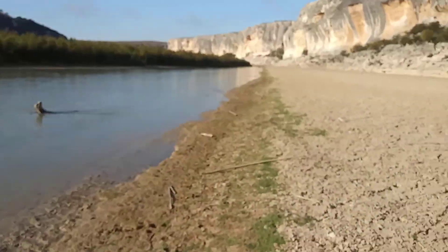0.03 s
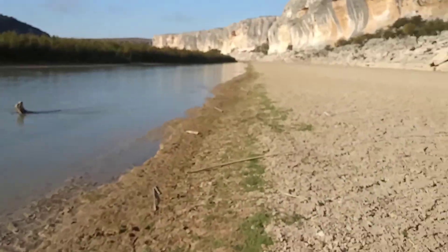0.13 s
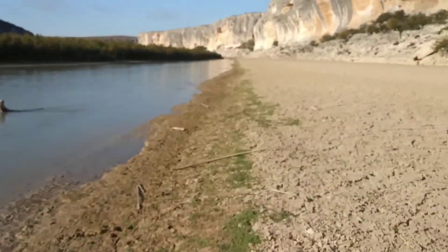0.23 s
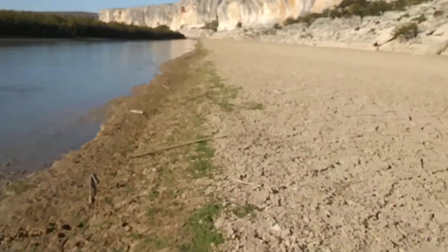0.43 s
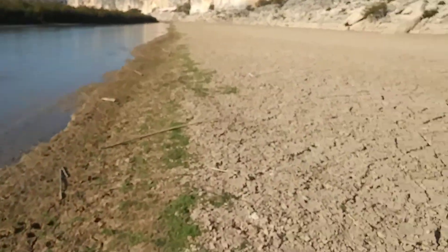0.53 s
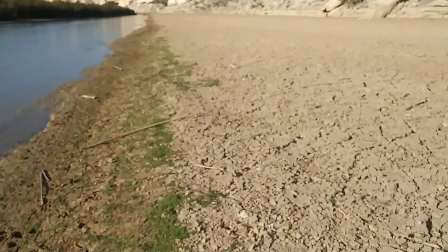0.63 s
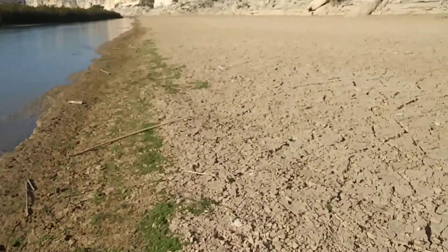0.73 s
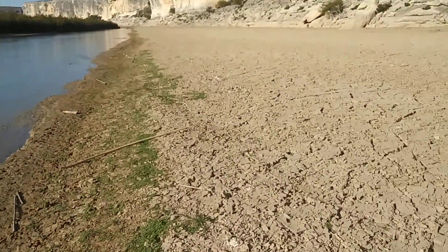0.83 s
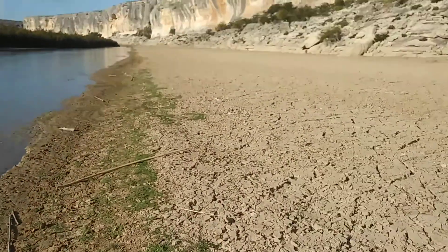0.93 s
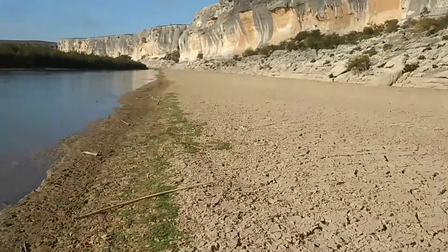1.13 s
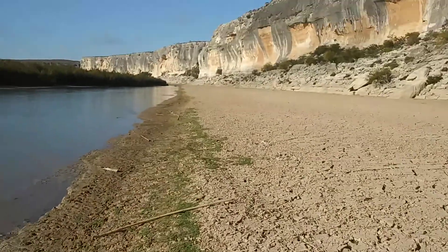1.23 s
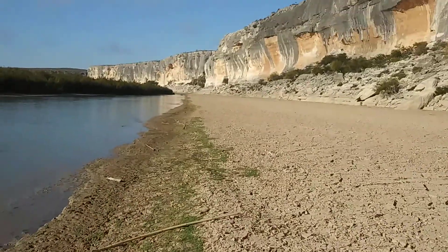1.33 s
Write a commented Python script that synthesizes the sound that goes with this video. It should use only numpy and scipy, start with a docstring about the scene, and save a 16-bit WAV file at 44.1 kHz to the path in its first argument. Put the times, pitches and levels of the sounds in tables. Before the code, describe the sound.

A single footstep crunches through sun-baked mud crust outdoors, then grinds the loose crumbs.

```python
"""A footstep on sun-baked mud: the heel thumps through the crust, the sole rolls on and snaps more
plates, and the push-off grinds the crumbs. Each snap is a burst of micro-fractures; dry clicks tick and
a loose plate rings hollow. Trouser cloth swishes as the leg swings through. Underneath lies a faint
open-air bed of river and breeze, and a thin, fluttering chirr comes up after the step."""
import sys
import numpy as np
from scipy import signal
from scipy.fft import rfft, irfft, next_fast_len
from scipy.io import wavfile
from scipy.ndimage import map_coordinates

SR = 44100
rng = np.random.default_rng(int(sys.argv[2]) if len(sys.argv) > 2 else 0)


def transcribe(u):
    """Save the signal u as a 16-bit wav file named by the first command-line argument.

    u: samples, shape (n,) or (channels, n), limited to [-1, 1]; the rate is SR.
    q: integer samples, one column per channel.
    """
    v = np.clip(np.atleast_2d(u).T, -1, 1)
    q = np.round(v * 32767).astype(np.int16)
    wavfile.write(sys.argv[1], SR, q)


N = 61739
TIME = np.arange(N) / SR


def amp(db):
    """Decibels to gain."""
    return 10 ** (np.asarray(db) / 20)


def unit(x):
    """Scale to rms 1."""
    return x / np.sqrt(np.mean(x ** 2) + 1e-20)


def fader(points):
    """Gain per sample from (time_s, level_db) points, holding the first and last levels."""
    return amp(np.interp(TIME, *np.transpose(points)))


def coloured(x, colour, size=2048):
    """Shape x with a minimum-phase EQ drawn through (freq_hz, gain_db) points."""
    freq_hz, gain_db = np.transpose(colour)
    bins_hz = np.fft.rfftfreq(size, 1 / SR)
    curve_db = np.interp(np.log(bins_hz + 1), np.log(freq_hz), gain_db)
    cepstrum = irfft(np.log(amp(curve_db)))
    cepstrum[1:size // 2] *= 2  # folded forward, so nothing rings ahead of a hit
    cepstrum[size // 2 + 1:] = 0
    impulse_response = irfft(np.exp(rfft(cepstrum)))
    return signal.fftconvolve(x, impulse_response)[:len(x)]


def add(track, start_s, sound):
    """Mix a sound in at its start time."""
    part = track[max(0, round(start_s * SR)):][:len(sound)]
    part += sound[:len(part)]


def wobble(per_s):
    """A smooth random curve with so many knots a second."""
    knots = rng.standard_normal(N)[:int(N * per_s / SR) + 4]
    return map_coordinates(knots, [TIME * per_s])


def rush(colour, levels, waver_db=0.5):
    """Soft, slightly wavering noise with an EQ and a level ride."""
    waver = amp(waver_db * wobble(per_s=25))
    return fader(levels) * waver * unit(coloured(rng.standard_normal(N), colour))


def ticks(per_s, spread_db, size):
    """Raw crackle: random tiny impulses of uneven strength."""
    hits = rng.random(size) < per_s / SR
    polarity = rng.choice([-1, 1], size)
    strength = amp(spread_db * np.clip(rng.standard_normal(size), -2, 2))
    return hits * polarity * strength


def ring(pitch_hz, t60_s, rise_s):
    """One damped mode with a softened attack."""
    decay = np.exp(-np.log(1000) * TIME / t60_s)
    attack = 1 - np.exp(-TIME / rise_s)
    return np.sin(2 * np.pi * pitch_hz * TIME) * decay * attack


def river_and_breeze():
    """Water and moving air lay down a soft midrange wash with a high hiss on top."""
    # EQ of the wash and of the hiss: freq_hz, gain_db
    wash_colour = [(30, -54), (70, -23), (150, -5.5), (400, -2.5), (700, -4), (1100, -2), (1700, 0),
                   (2050, 1), (2500, -8.5), (4000, -17), (10000, -38), (16000, -36)]
    hiss_colour = [(2000, -12.5), (4000, -9.5), (6300, 4.5), (8000, 0.5), (9500, -8), (11500, -22.5),
                   (16000, -26)]
    # level ride of each: time_s, level_db
    wash_levels = [(0, -55.5), (.5, -61), (.87, -63.5), (1.04, -60), (1.2, -57.5), (1.4, -58)]
    hiss_levels = [(0, -56), (.17, -54), (.4, -55.5), (.8, -63.5), (.98, -61), (1.04, -64), (1.13, -60),
                   (1.4, -64)]
    return rush(wash_colour, wash_levels) + rush(hiss_colour, hiss_levels)


def crumbs():
    """Loose grit crackles as it grinds under the sole."""
    # swells of the grinding: time_s, level_db
    grind_levels = [(.175, -67), (.2, -97), (.24, -31), (.26, -57), (.3, -49.5), (.39, -56.5), (.43, -45),
                    (.47, -38), (.51, -50.5), (.565, -58.5), (.61, -52.5), (.645, -37), (.663, -52.5),
                    (.76, -59), (.86, -62.5), (1.4, -94)]
    # EQ of the grit: freq_hz, gain_db
    grit_colour = [(80, -24), (300, -7.5), (800, -1.5), (1400, 6.5), (2200, -8), (2900, 2), (3900, -8),
                   (5000, -1.5), (8500, -11.5), (10800, -40), (16000, -47)]
    crackle = ticks(per_s=3200, spread_db=9, size=N)
    return fader(grind_levels) * unit(coloured(crackle, grit_colour))


def fracture(length_s, colour, settle_s, settle_db, attack_s=0.00018, size=3072):
    """A run of micro-fractures and its tail of settling debris, with the energy of 5 ms at rms 1."""
    t = np.arange(size) / SR
    attack = 1 - np.exp(-t / attack_s)
    breaking = np.exp(-(t / length_s) ** 2.2)
    settling = amp(settle_db) * np.exp(-t / settle_s)
    crackle = ticks(per_s=13000, spread_db=2.5, size=size)
    burst = coloured(attack * (breaking + settling) * crackle, colour)
    return burst * np.sqrt(0.005 * SR / (np.sum(burst ** 2) + 1e-20))


def crust():
    """Each snap knocks the hollow below, rings the mud plate and sprays brittle treble and splinters."""
    # snaps of the crust: start_s, length_s, pitch_hz, knock_db, plate_db, brittle_db
    snaps = [(0.187, 0.0017, 1040, -42, -51, -35.5), (0.2005, 0.001, 1440, -51, -65, -42),
             (.2054, 0.0048, 1974, -15, -19, -11.5), (.209, 0.0074, 1100, -23, -24.5, -19),
             (0.212, 0.0076, 1630, -34.5, -25, -19), (0.2216, 0.0059, 1330, -26.5, -28.5, -13.5),
             (0.2349, 0.0014, 1420, -50, -32, -22.5), (.2373, 0.001, 1370, -58, -36, -28),
             (0.2419, 0.0012, 1300, -50, -36, -28), (0.244, 0.0024, 1320, -51, -32, -21.5),
             (0.2651, 0.0017, 1280, -32.5, -30, -20.5), (0.268, 0.00065, 1240, -65, -47, -23),
             (0.28, 0.0012, 1290, -40, -41.5, -36.5), (0.2955, 0.0024, 1170, -44.5, -52, -46),
             (0.302, 0.0075, 1480, -43.5, -50, -37.5), (0.339, 0.0026, 1480, -60, -51.5, -47),
             (0.3536, 0.0037, 1950, -73, -51, -43.5), (0.415, 0.0023, 1660, -49, -32.5, -31),
             (0.422, 0.0061, 1480, -60, -43.5, -33.5), (0.44, 0.00059, 1500, -62, -38, -27.5),
             (0.4436, 0.0021, 1575, -37.5, -19.5, -23.5), (0.4583, 0.0024, 1300, -47.5, -34.5, -30.5),
             (0.464, 0.0056, 1370, -45, -23.5, -17.5), (0.472, 0.002, 1560, -56, -27.5, -30),
             (0.48, 0.0039, 1180, -51, -43.5, -37.5), (0.4993, 0.0019, 1510, -67, -40, -27.5),
             (0.5872, 0.0012, 1910, -62, -47.5, -50), (0.622, 0.0017, 1380, -44, -49, -34),
             (.626, 0.0015, 1450, -56, -48, -38), (0.635, 0.0072, 1315, -50, -34.5, -45),
             (.6408, 0.0013, 1290, -50, -36.5, -36.5), (.6442, 0.0019, 1360, -53, -41, -39.5),
             (0.6573, 0.0028, 1470, -52, -44, -45), (0.6677, 0.0018, 1470, -56, -47, -36),
             (0.7, 0.0072, 1350, -72, -48.5, -42.5), (0.747, 0.0019, 1500, -56.5, -46.5, -40.5),
             (0.753, 0.0079, 1300, -53.5, -45.5, -48), (0.829, 0.0024, 2000, -55, -52, -62)]
    # EQ of the four layers of a snap: freq_hz, gain_db
    knock_colour = [(60, -40), (130, -19.5), (260, -15), (440, -3.5), (640, -8.5), (820, -1), (1080, -10.5),
                    (1800, -11.5), (5000, -53.5)]
    plate_colour = [(300, -44), (800, -14.5), (1200, -5.5), (1450, 2.5), (1700, -5.5), (2250, -15.5),
                    (2800, -14.5), (3600, -15), (7000, -43)]
    brittle_colour = [(900, -27), (2300, -20.5), (2950, -2), (3400, -6), (4100, -5.5), (4900, -0.5),
                      (6300, 0.5), (7700, 1.5), (9200, -3), (10700, -22.5), (13500, -34), (16000, -33)]
    splinter_colour = [(6000, -24), (10000, 5.5), (13500, 4.5), (16000, -20)]
    # debris tails of knock, plate and treble: decay_s in the first table, level_db in the second
    settle_s = [0.00705, 0.0055, 0.0077]
    settle_db = [-22, 3.5, -14]
    knock_tail, plate_tail, treble_tail = zip(settle_s, settle_db)
    plate_peak_hz = 1450  # the plate's EQ slides to put this peak on each snap's pitch
    out = np.zeros(N)
    for start_s, length_s, pitch_hz, knock_db, plate_db, brittle_db in snaps:
        tuned_plate = np.multiply(plate_colour, [pitch_hz / plate_peak_hz, 1])
        # the hardest and shortest snaps throw the most top treble
        shortness_octaves = np.log2(settle_s[-1] / length_s)
        splinter_db = -15 + 1.58 * brittle_db + 3.5 * shortness_octaves
        knock = amp(knock_db) * fracture(length_s, knock_colour, *knock_tail)
        plate = amp(plate_db) * fracture(length_s, tuned_plate, *plate_tail)
        brittle = amp(brittle_db) * fracture(length_s, brittle_colour, *treble_tail)
        splinters = amp(splinter_db) * fracture(length_s, splinter_colour, *treble_tail)
        add(out, start_s, knock + plate + brittle + splinters)
    return out


def thumps():
    """Dead, low thuds as the foot lands, rolls and lifts."""
    # thuds of the foot: start_s, pitch_hz, relative_db
    thuds = [(0.2058, 140, -24), (0.231, 85, -47), (0.2645, 110, -56), (0.485, 92, -61), (.912, 195, -56)]
    out = np.zeros(N)
    for start_s, pitch_hz, relative_db in thuds:
        add(out, start_s, 2 * amp(relative_db) * ring(pitch_hz, t60_s=0.035, rise_s=0.0019))
    return out


def dry_clicks():
    """Short, dry, pitched clicks of one mode each: small clods and the ring of some snaps."""
    # pitched clicks: start_s, pitch_hz, peak_db
    clicks = [(0.3595, 1910, -33), (0.364, 1950, -34), (.4442, 2580, -16.5), (0.5004, 3080, -25.5),
              (.525, 1780, -28.5), (0.732, 2920, -39)]
    out = np.zeros(N)
    for start_s, pitch_hz, peak_db in clicks:
        click = ring(pitch_hz, t60_s=0.005, rise_s=0.0005)
        add(out, start_s, amp(peak_db) * click / np.abs(click).max())
    return out


def loose_plate(pitch_hz=1430):
    """A loose plate rings hollow in one narrow resonance while the sole grinds on it."""
    # swells of the ring: time_s, level_db
    ring_levels = [(.62, -68), (.655, -51.5), (.72, -63), (.755, -57.5), (.88, -80)]
    b, a = signal.iirpeak(pitch_hz, Q=pitch_hz / 210, fs=SR)
    grinding = rng.standard_normal(N)
    ringing = signal.lfilter(b, a, signal.lfilter(b, a, grinding))  # twice, for steep skirts
    return fader(ring_levels) * unit(ringing)


def trouser_swish():
    """The trouser legs brush past each other: a dull rub, then a brighter one as the leg speeds up."""
    # EQ of each rub: freq_hz, gain_db
    dull_colour = [(70, -13), (170, -4), (400, -1.5), (800, 3.5), (1300, -2), (2400, -15), (8000, -20),
                   (11000, -35)]
    bright_colour = [(700, -25), (1400, -3), (1900, 1), (2400, -19), (4000, -23), (8000, -13), (11000, -40)]
    # level ride of each, the dull rub starting again at the very end: time_s, level_db
    dull_levels = [(.895, -70.5), (0.933, -51), (.97, -56), (1.025, -66), (1.37, -81), (1.395, -53.5)]
    bright_levels = [(.92, -79), (.945, -55), (1.008, -50), (1.035, -78)]
    return rush(dull_colour, dull_levels) + rush(bright_colour, bright_levels)


def chirr(centre_hz=1640, wander_hz=65, flutter_db=6, flutter_per_s=130):
    """A thin, unsteady tone that comes in quick, uneven pulses."""
    # swell after the step: time_s, level_db
    chirr_levels = [(1.03, -71), (1.1, -60), (1.23, -56.5), (1.4, -62)]
    pitch_hz = centre_hz + wander_hz * wobble(flutter_per_s)
    tone = np.sin(2 * np.pi * np.cumsum(pitch_hz) / SR)
    pulses = amp(flutter_db * np.minimum(wobble(flutter_per_s), 1))
    return fader(chirr_levels) * unit(pulses * tone)


def scene():
    """The step, the cloth and the chirr over river and breeze, in mono."""
    step = crust() + thumps() + dry_clicks() + crumbs() + loose_plate()
    return (step + trouser_swish() + river_and_breeze() + chirr())[None]


def record(dry):
    """The microphone sheds deep bass, rounds the highest peaks and keeps nothing above its band limit."""
    low_cut_hz, top_hz, roll_off_hz = 62, 16500, 900
    ceiling, hardness = 0.72, 5  # soft clip
    low_cut = signal.butter(2, low_cut_hz, "highpass", fs=SR, output="sos")
    thinned = signal.sosfilt(low_cut, dry)
    rounded = thinned / (1 + np.abs(thinned / ceiling) ** hardness) ** (1 / hardness)
    size = next_fast_len(N + SR // 2)
    edge = np.clip((top_hz - np.fft.rfftfreq(size, 1 / SR)) / roll_off_hz, 0, 1)
    high_cut = np.sin(np.pi / 2 * edge) ** 2
    return irfft(rfft(rounded, size) * high_cut, size)[..., :N]


dry = scene()
out = record(dry)
transcribe(out)
```